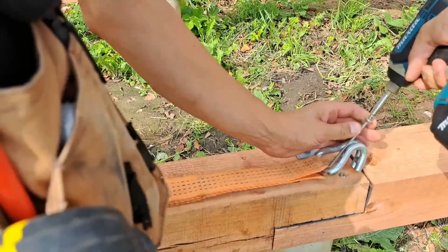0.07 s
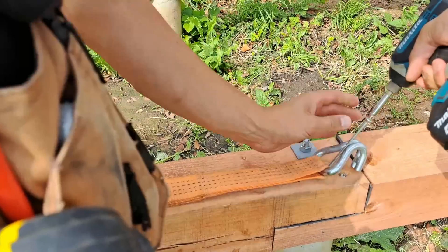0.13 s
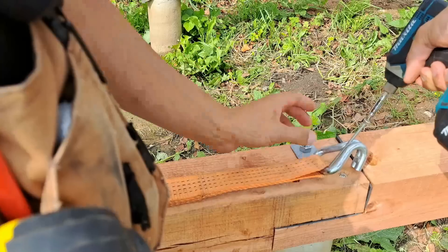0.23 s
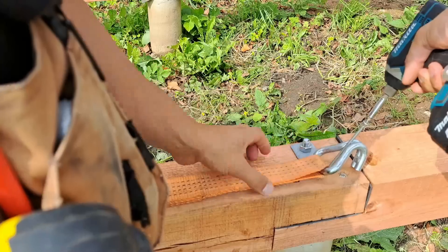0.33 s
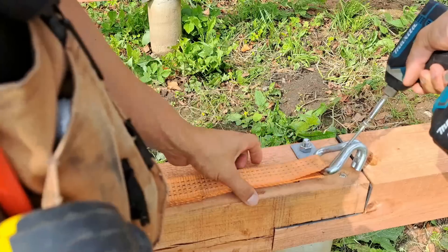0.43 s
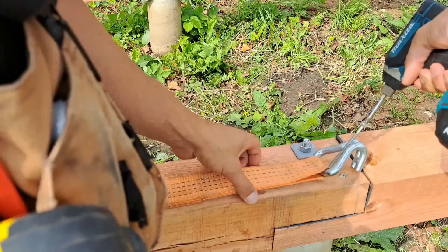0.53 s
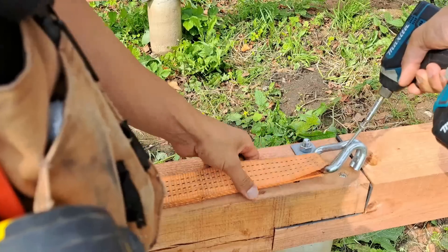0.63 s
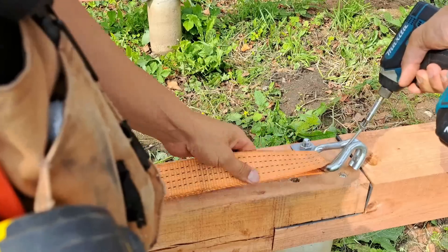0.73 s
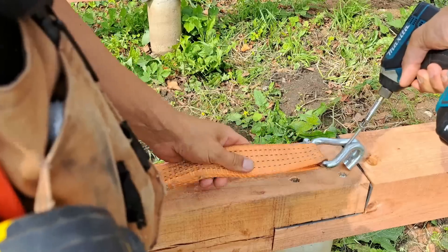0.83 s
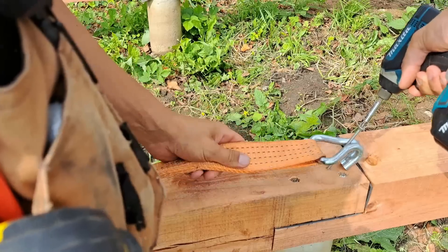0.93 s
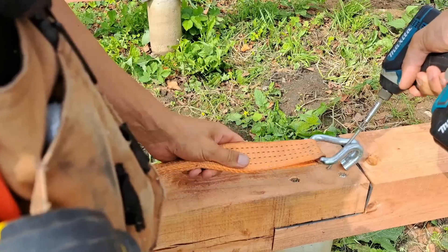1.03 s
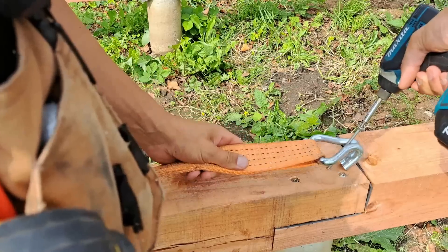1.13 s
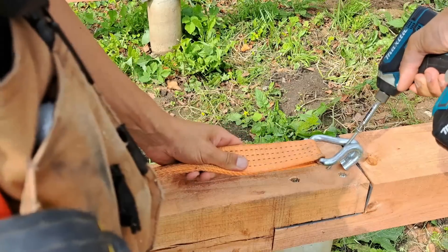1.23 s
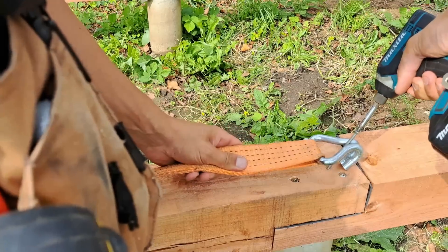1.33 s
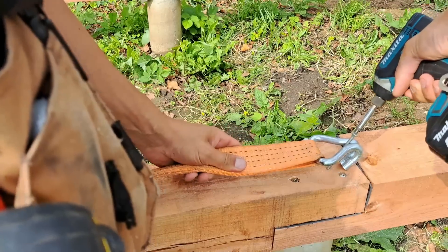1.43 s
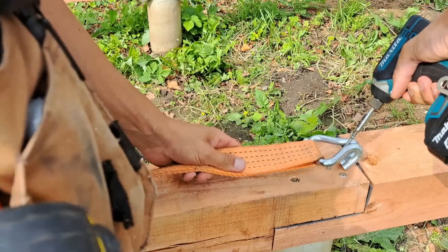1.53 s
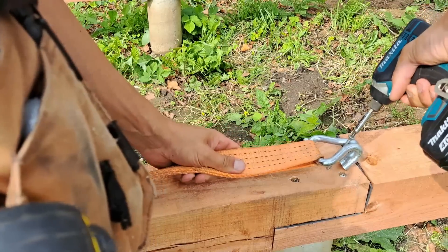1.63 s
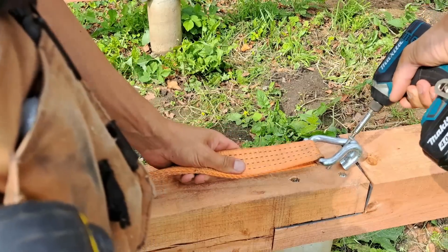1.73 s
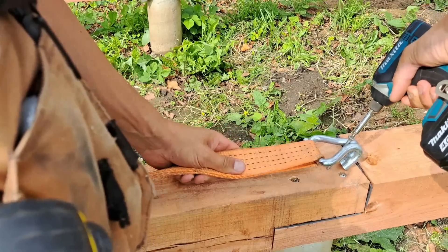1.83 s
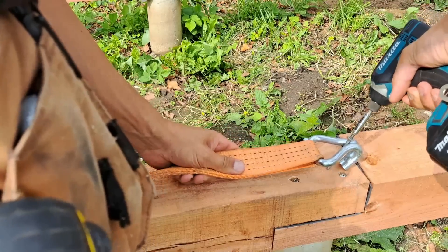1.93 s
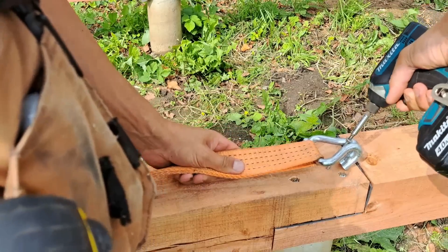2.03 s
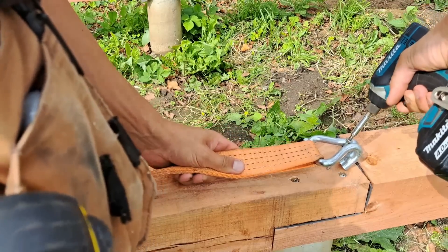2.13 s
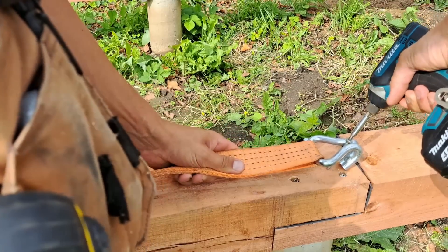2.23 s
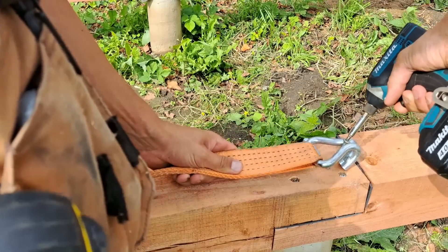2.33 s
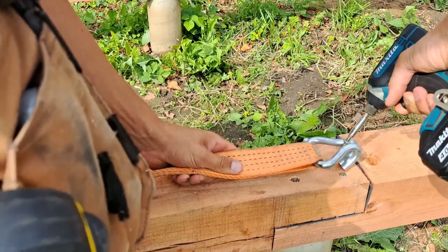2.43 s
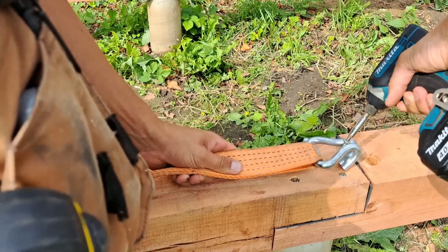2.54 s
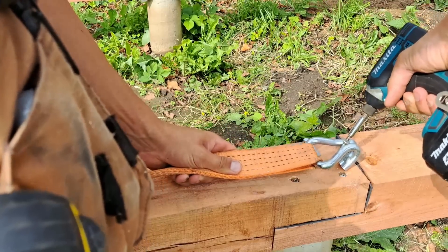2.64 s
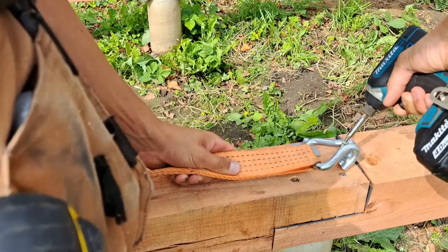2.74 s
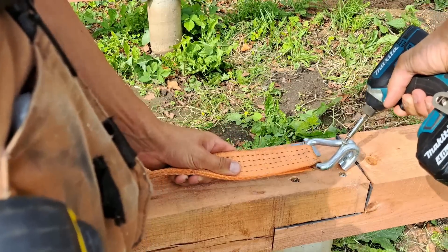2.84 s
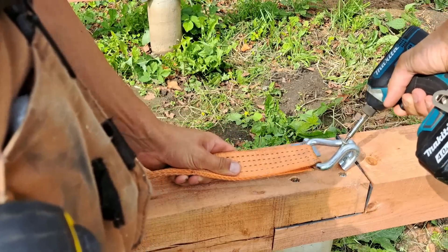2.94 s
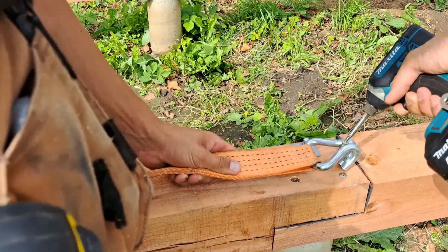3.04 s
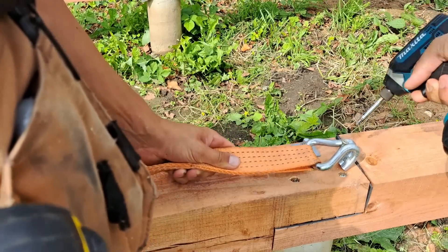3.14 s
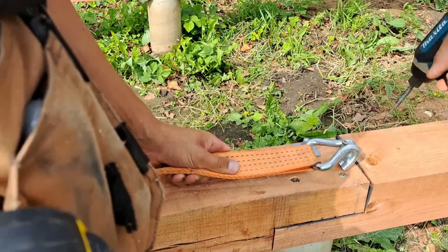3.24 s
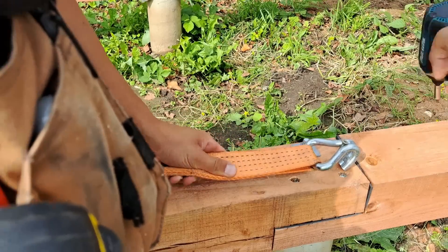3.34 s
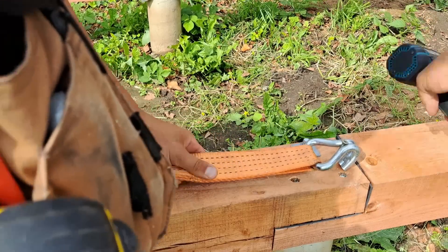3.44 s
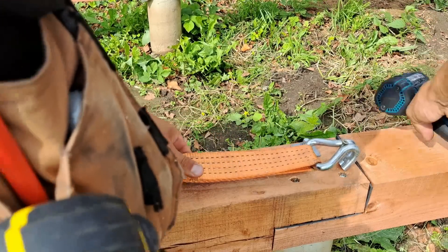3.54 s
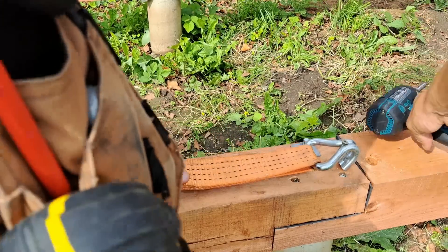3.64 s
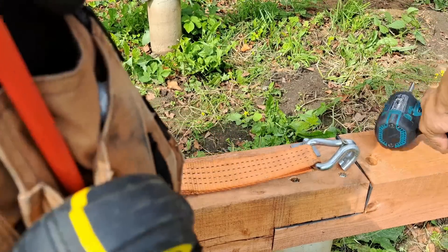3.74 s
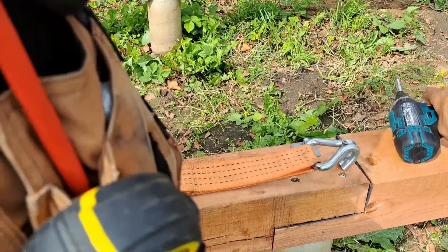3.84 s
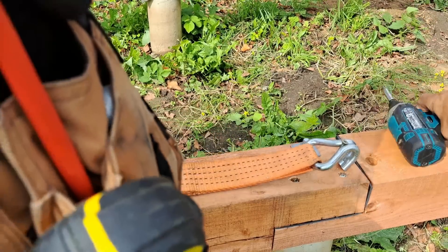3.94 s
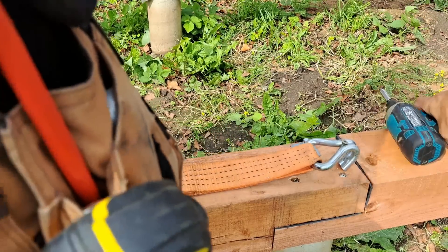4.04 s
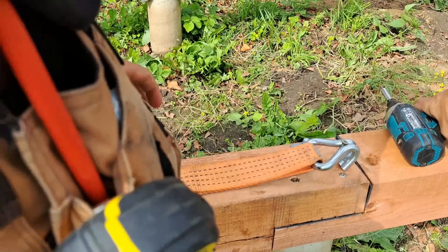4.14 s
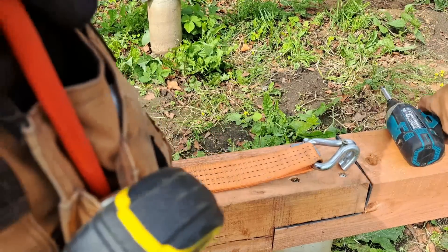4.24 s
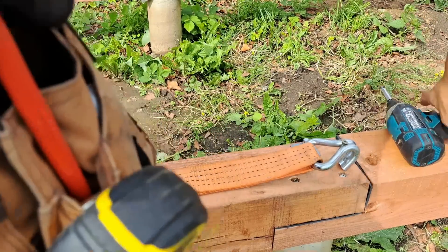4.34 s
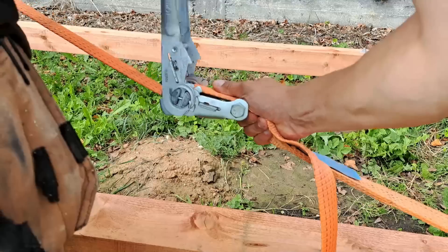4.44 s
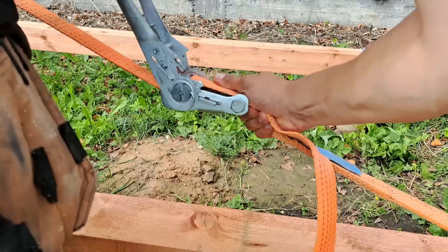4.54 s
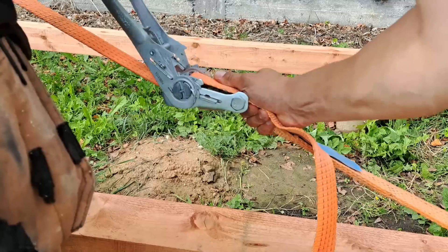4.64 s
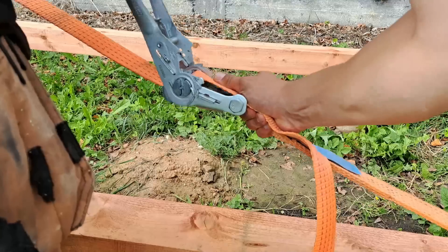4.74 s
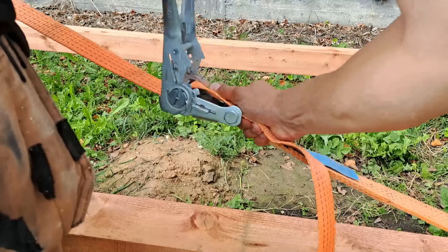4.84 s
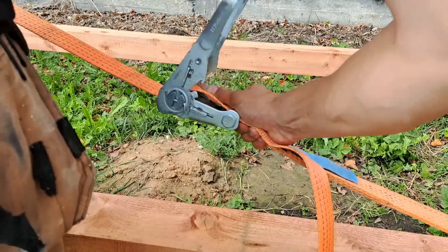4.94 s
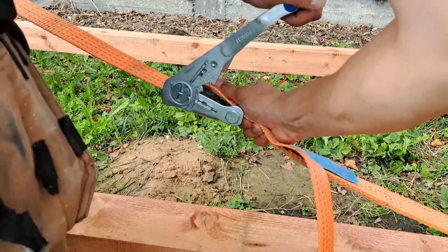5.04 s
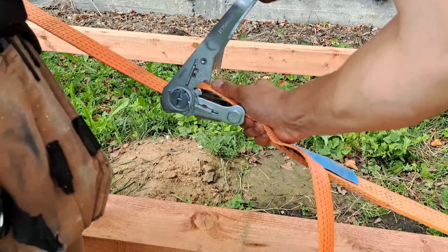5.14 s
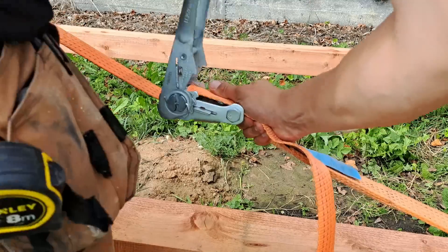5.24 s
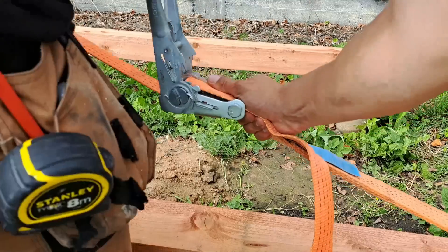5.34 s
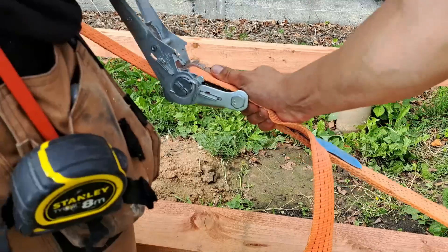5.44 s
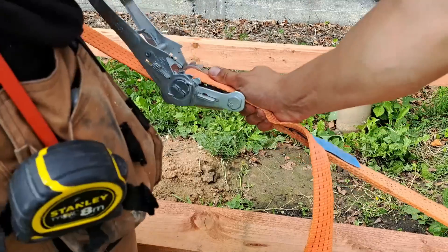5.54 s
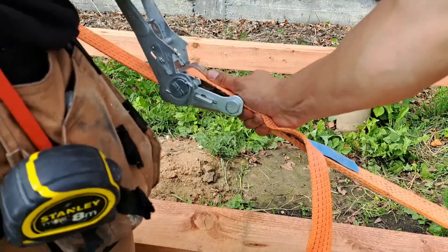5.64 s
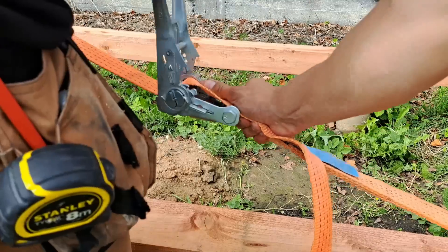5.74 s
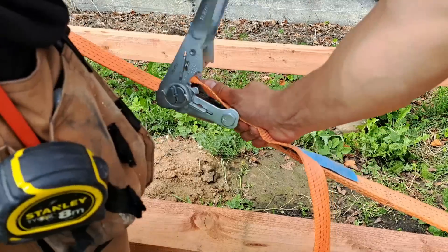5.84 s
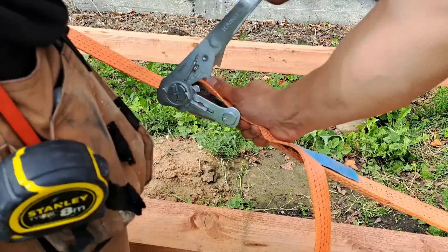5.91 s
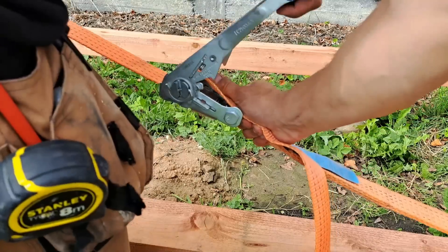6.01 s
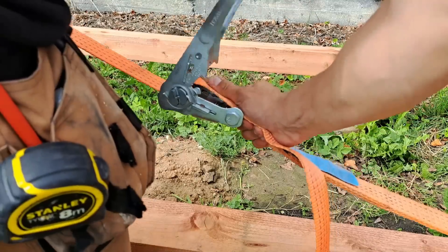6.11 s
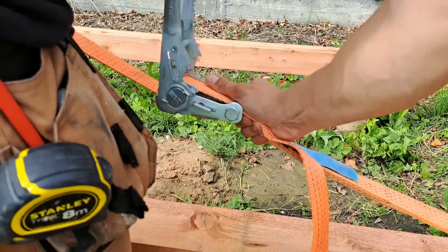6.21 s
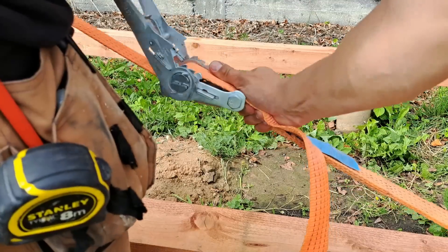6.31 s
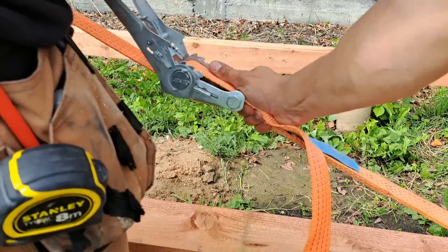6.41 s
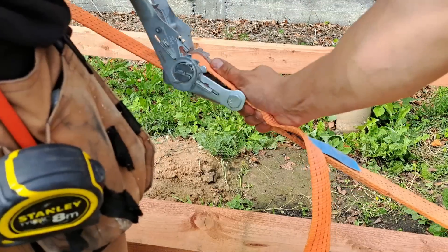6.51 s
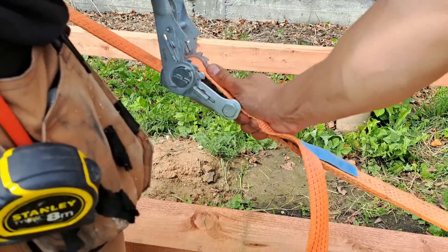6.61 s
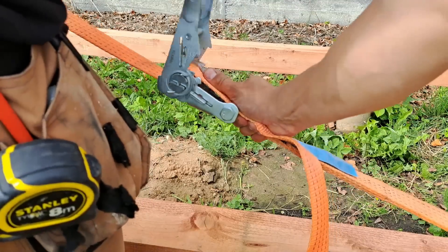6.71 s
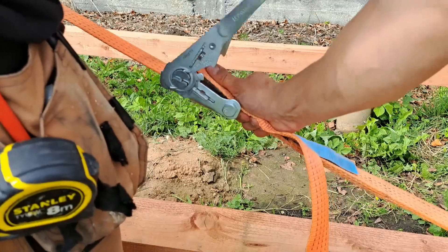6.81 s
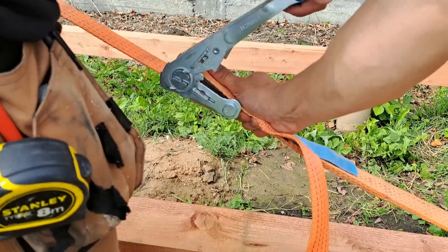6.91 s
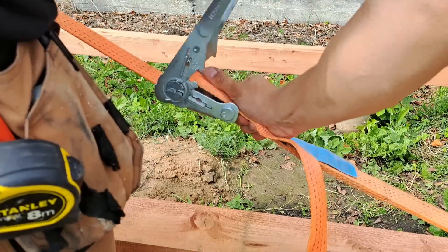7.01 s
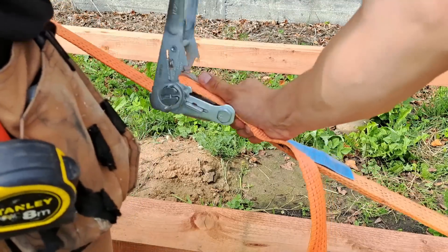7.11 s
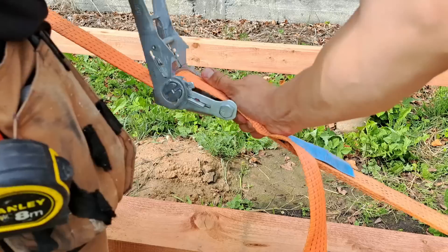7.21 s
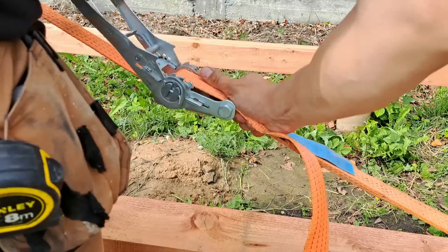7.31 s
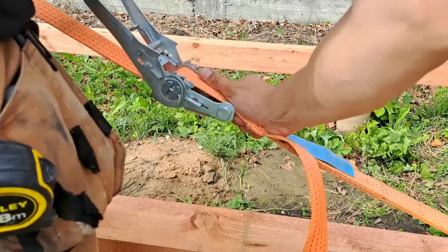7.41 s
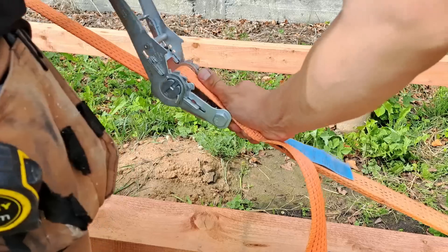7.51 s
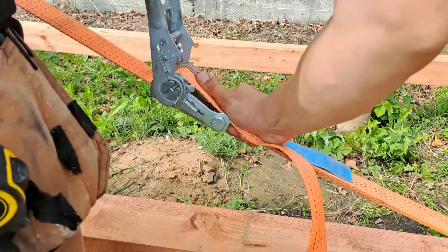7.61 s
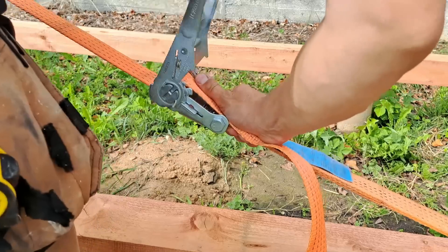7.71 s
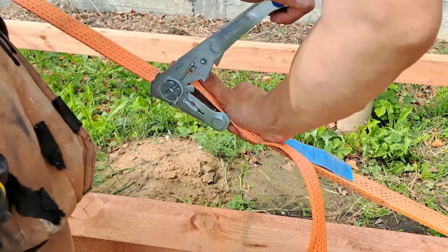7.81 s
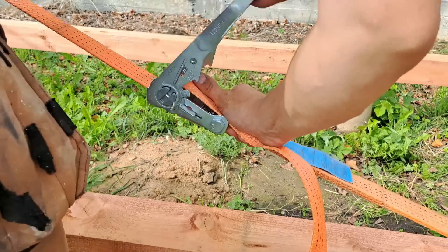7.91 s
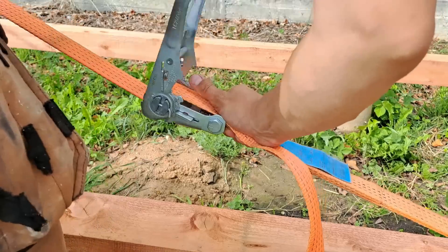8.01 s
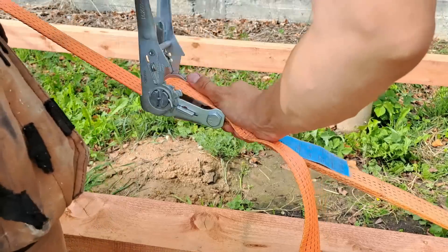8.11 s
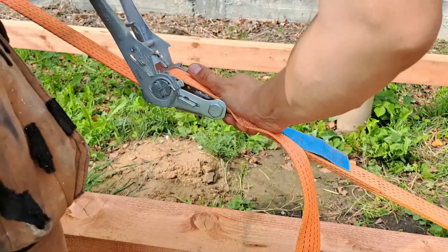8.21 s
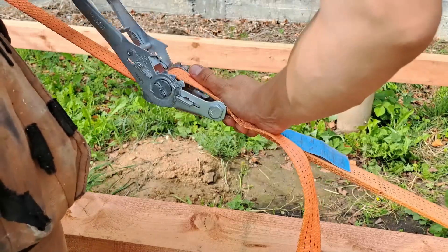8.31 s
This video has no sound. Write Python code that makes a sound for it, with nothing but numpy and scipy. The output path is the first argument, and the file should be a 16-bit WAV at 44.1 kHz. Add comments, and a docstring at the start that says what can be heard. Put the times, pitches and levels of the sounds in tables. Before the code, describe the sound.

First a cordless driver whines briefly a few times, then drives a screw with fast clattering blows, one long burst among short ones. It stops; a tool belt rubs and thumps softly right by the microphone. From the middle on, a metal ratchet near the centre snaps loudly, single clacks at first and later in pairs, with light rattling. Open air, faint hiss, a slight short reflection.

```python
"""Outdoors on a timber frame: an impact driver spins free in short blips, then hammers a screw in, in five bursts.
Its motor is swept lines and noise; its blows are damped steel modes that also excite the timber's resonances.
Then a strap ratchet is pumped: steel pawls snap over the teeth and ring the frame, and the handle rattles.
A tool belt rubs and bumps close to the microphone, as shaped low noise and damped swings, over a faint hiss."""
import sys
import numpy as np
from scipy import signal
from scipy.fft import rfft, irfft, next_fast_len
from scipy.io import wavfile
from scipy.ndimage import uniform_filter1d, map_coordinates

SR = 44100
rng = np.random.default_rng(int(sys.argv[2]) if len(sys.argv) > 2 else 0)


def to_wav(sig):
    """Store sig (one row per channel, or 1-D mono) as 16-bit WAV at the path in sys.argv[1].

    Samples outside -1..1 are clipped; the rate is SR.
    """
    pcm = np.clip(np.atleast_2d(sig), -1, 1) * 32767
    pcm = np.round(pcm).astype(np.int16)
    wavfile.write(sys.argv[1], SR, pcm.T)  # frames by channels


N = 368676
TIME = np.arange(N) / SR
AGE = np.arange(SR // 3) / SR  # time since a blow [s]


def amp(db):
    """Level definition: decibels to amplitude gain."""
    return 10 ** (np.asarray(db) / 20)


def unit(x):
    """Normalization: scale to an rms of 1."""
    return x / np.sqrt(np.mean(x ** 2) + 1e-20)


def along(points, hz):
    """Interpolation of (frequency [Hz], value) points on a logarithmic frequency axis."""
    f, v = np.transpose(points)
    return np.interp(np.log(hz + 1), np.log(f + 1), v)


def wobble(rate):
    """Random modulation: a smooth curve through Gaussian knots, rate of them a second."""
    knots = rng.standard_normal(int(N * rate / SR) + 4)
    return map_coordinates(knots, [TIME * rate])


def filtered(x, response):
    """Linear filtering: the spectrum of x times a complex frequency response."""
    n = x.shape[-1]
    m = next_fast_len(n + 8192)
    return irfft(rfft(x, m) * response(np.fft.rfftfreq(m, 1 / SR)), m)[..., :n]


def noise(spectrum, alike, size=N):
    """Partial coherence: coloured stereo noise of rms 1; alike is the correlation of the sides."""
    a, b = rng.standard_normal((2, size))
    turn = np.arccos(np.clip(alike, -1, 1)) / 2
    pair = np.cos(turn) * a + np.sin(turn) * np.array([b, -b])
    return unit(filtered(pair, lambda hz: amp(along(spectrum, hz))))


def place(x, lag_ms, right_db):
    """Interaural differences: the right side is later by lag_ms and louder by right_db."""
    side = np.array([[-.5], [.5]])
    delayed = filtered(x, lambda hz: np.exp(-2j * np.pi * hz * side * lag_ms / 1000))
    return amp(side * right_db) * delayed


def add(track, s, sound):
    """Superposition: mix a sound in at time s."""
    part = track[:, max(round(s * SR), 0):][:, :sound.shape[-1]]
    part += sound[..., :part.shape[1]]


def gate_db(start, end, rise_db_per_s, fall_db_per_s):
    """Exponential growth and decay, straight in dB: 0 from start to end, falling off outside."""
    before, after = np.maximum(start - TIME, 0), np.maximum(TIME - end, 0)
    return -rise_db_per_s * before - fall_db_per_s * after


def strike(rise, t60):
    """Impact envelope: a smooth onset and exponential decay, with a peak of 1."""
    shape = (1 - np.exp(-(AGE / rise) ** 2)) * amp(-60 * AGE / max(t60, .002))
    return shape / shape.max()


def clack(spectrum, rise, t60, alike, body_db=0, uneven_db=5):
    """High modal density: damped steel modes merge into noise, uneven by chance; body_db lifts the low ones."""
    hz = np.linspace(100, 17000, 90)
    body = body_db / (1 + (hz / 4500) ** 4)
    db = along(spectrum, hz) + body + uneven_db * rng.uniform(-1.5, 1, len(hz))
    return noise(np.column_stack([hz, db]), alike, size=len(AGE)) * strike(rise, t60)


# Course of the outdoor hiss: (time [s], relative level [dB])
HISS_COURSE = [(3.0, -70), (3.45, -72), (4.12, -63), (5.76, -71), (5.89, -67), (7.66, -69), (7.91, -63.5),
               (8.04, -65.5), (8.24, -71), (8.36, -56)]
# Colour of the outdoor hiss: (frequency [Hz], relative level [dB])
HISS_SPECTRUM = [(150, -23.5), (450, -14), (800, -19), (1500, -21.5), (4000, -21), (7500, -22.5),
                 (9500, -27), (15000, -29.5)]


def air():
    """Broadband ambient noise: a faint, slightly restless hiss, stronger at first."""
    hush_db = np.interp(TIME, *np.transpose(HISS_COURSE)) + 4.0
    early_db = np.interp(TIME, [.8, 3.1], [10, 0])
    return amp(hush_db + early_db + 0.44 * wobble(36)) * noise(HISS_SPECTRUM, alike=0.09)


# Decay of the scattered tail: (frequency [Hz], t60 [s])
YARD_DECAY = [(200, .2), (1000, 0.22), (5000, 0.13), (15000, 0.059)]


def yard(x, wall_s):
    """Scattering and reflection: ground and timbers give a short tail, a wall returns a second one."""
    hz, t, z = signal.stft(rng.standard_normal((2, SR // 2)), SR, nperseg=256)
    decay = amp(-60 * t / along(YARD_DECAY, hz)[:, None])
    tail = signal.istft(z * decay, SR, nperseg=256)[1]
    answer = np.zeros((2, SR))
    add(answer, .003, tail)
    add(answer, wall_s, amp(-15) * tail[::-1])  # sides swapped
    return signal.fftconvolve(x, answer / np.linalg.norm(answer[0]), axes=1)[:, :N]


# Movement of the tool belt near the microphone, stretch by stretch: (time [s], relative level [dB])
BELT_MOVES = [
    [(0.0, -54), (0.05, -44), (0.094, -61), (0.266, -54), (0.312, -46.5), (0.338, -49.5), (0.62, -48)],
    [(0.92, -44), (1.19, -41), (1.53, -56.5), (1.68, -43), (2.31, -58.5), (2.7, -44.5), (3.48, -68.5)],
    [(3.5, -67), (3.57, -49), (3.646, -53), (3.92, -48.5), (3.95, -33), (4.002, -47), (4.12, -41)],
    [(4.14, -52), (4.222, -51.5), (4.324, -40.5), (4.35, -59), (4.38, -27), (4.448, -70), (4.48, -77)],
    [(4.5, -62), (4.664, -54.5), (5.312, -81.5), (5.356, -50.5), (5.598, -83.5), (5.878, -58.5), (6.3, -71)],
    [(6.32, -81), (6.64, -89), (6.92, -61), (7.0, -99.5), (7.94, -55), (8.0, -74), (8.36, -57)],
]
# Colour of the cloth's rumble: (frequency [Hz], relative level [dB])
RUMBLE_SPECTRUM = [(12, -38.5), (20, -10.5), (43, -2), (59, 6.5), (86, -2.5), (125, 1.5), (221, -19),
                   (300, -13), (390, -46), (660, -120)]
# Colour of the cloth's rub: (frequency [Hz], relative level [dB])
RUB_SPECTRUM = [(90, -15.5), (160, -1), (220, -5), (330, -0.5), (470, -7), (700, -22.5), (1500, -43)]
MOVE_TOP_DB, USUAL_MOVE_DB = -38.5, -50  # cap on the movement; harder contacts are bumps
RUMBLE_DB, RUB_DB, RUB_GROWS = 1, -6.5, 1.3  # the rub swings a little wider than the rumble
RUB_SMOOTHING_S = 0.21  # the movement is smoothed over this time for the rub


def belt():
    """Friction noise: cloth rumbles in lumps and rubs, and the harder it moves, the more it rubs."""
    move_db = np.minimum(np.interp(TIME, *np.concatenate(BELT_MOVES).T), MOVE_TOP_DB)
    lumps_db = 2 * wobble(22)
    slow_db = uniform_filter1d(move_db, max(round(RUB_SMOOTHING_S * SR), 1))
    rub_db = USUAL_MOVE_DB + RUB_DB + RUB_GROWS * (slow_db - USUAL_MOVE_DB)
    rub_db = rub_db + .6 * lumps_db + 1.5 * wobble(45)
    rumble = amp(move_db + RUMBLE_DB + lumps_db) * noise(RUMBLE_SPECTRUM, alike=0.091)
    rumble = rumble * amp([[-2.5], [2.5]])  # louder on the right
    return rumble + amp(rub_db) * noise(RUB_SPECTRUM, alike=1.0)


# Dull bumps of tools, belt and strap: (time [s], relative level [dB], pitch [Hz], decay scale [s])
DULL_BUMPS = [(.792, -22, 418, 0.096), (0.81, -18.5, 112, 0.18), (.83, -14.5, 254, 0.071),
              (0.864, -28, 230, .08), (3.567, -33, 120, .07), (3.933, -28, 228, 0.042),
              (3.948, -21.5, 81.3, .07), (3.977, -24, 214, 0.12), (4.042, -20.5, 350, 0.067),
              (4.055, -27.5, 190, 0.13), (4.078, -25, 140, 0.079), (4.43, -35, 90, 0.045),
              (8.206, -12.5, 375, 0.059), (8.225, -23.5, 334, 0.14)]


def bumps():
    """Damped oscillation: a soft, heavy contact gives a low swing with a puff of noise around it."""
    out = np.zeros((2, N))
    for s, db, hz, decay in DULL_BUMPS:
        colour = [(hz / 4, -24), (hz * 0.94, -1), (hz, 0), (hz * 2.67, -8), (hz * 4, -26), (hz * 16, -55)]
        puff = noise(colour, alike=0.24, size=len(AGE)) * strike(rise=0.00099, t60=decay * 1.54)
        swing = np.sin(2 * np.pi * hz * AGE) * strike(rise=0.0024, t60=decay * 0.62)
        add(out, s, amp(db - 10.5) * puff + amp(db - 5.5) * swing)
    return out


# Light contacts of handle, hook and tools: (time [s], relative level [dB], low-mode lift before scaling [dB])
LIGHT_RATTLES = [(0.806, -37, 17), (4.0414, -21, -2), (4.0791, -36, 6), (4.8233, -31, -35.5),
                 (4.8654, -28, -26), (4.8876, -27, -24.5), (5.1559, -39.5, -18), (5.2608, -36.5, -16),
                 (5.3824, -52.5, 16), (5.7237, -33, -18.5), (5.7685, -44, -13), (5.808, -31, -19),
                 (6.1677, -34.5, -31), (6.1948, -36, -6.5), (7.056, -47, -12), (7.0719, -33, -8),
                 (7.7108, -44, -48), (7.9855, -37, -41), (7.9942, -31, -11), (8.0063, -28, -21),
                 (8.056, -49, 2)]
# Colour of loose steel parts: (frequency [Hz], relative level [dB])
RATTLE_SPECTRUM = [(400, -11), (900, -9.5), (1400, 1), (2400, 2.5), (5000, 4), (8000, -2), (12000, -7.5),
                   (16000, -11)]
PUMPING_S, TICKS_PER_S, TICK_DB = (4.6, 8.2), 1.8, -52  # faint stray ticks while the handle is worked


def rattles():
    """Repeated impact: steel parts touch lightly after a faint swell, and settle in smaller, duller ticks."""
    out = np.zeros((2, N))
    for s, db, body_db in LIGHT_RATTLES:
        touch = clack(RATTLE_SPECTRUM, rise=0.00092, t60=0.026, alike=0.46, body_db=0.84 * body_db + 2.5)
        add(out, s, amp(db - 1.5) * touch)
        swell = clack(RATTLE_SPECTRUM, rise=.012, t60=0.078, alike=.5, body_db=0.15 * body_db + 6)
        add(out, s - .014, amp(db - 24.5) * swell)
        for delay in rng.uniform(0.0016, 0.016, size=4):
            tick = clack(RATTLE_SPECTRUM, rise=0.0014, t60=.025, alike=.5,
                         body_db=0.24 * body_db + 16, uneven_db=1.0)
            add(out, s + delay, amp(db - 17.5 - 440 * delay) * tick)
    stray_count = round((PUMPING_S[1] - PUMPING_S[0]) * TICKS_PER_S)
    for s in rng.uniform(*PUMPING_S, size=stray_count):
        stray = clack(RATTLE_SPECTRUM, rise=0.00035, t60=0.028, alike=0.72, body_db=-5.5)
        add(out, s, amp(TICK_DB) * stray)
    return out


# Resonances of the ratchet's steel frame: (nominal frequency [Hz], relative level [dB], t60 [s])
FRAME_MODES = [(2290, -21, .24), (3360, -11, .1), (4040, -15, .16), (5550, -10, .09), (7000, -12, .12),
               (8230, -8, .14), (10040, -2, .06), (10400, -11, .1), (11600, -3, .13), (12700, -2, .1),
               (13630, -6, .11), (14500, 6.5, .077), (15600, -1, .1)]
FRAME_DB, FRAME_SCATTER_DB = -25, 4  # the ring within a snap; spread of its modes


def frame_ring():
    """Modal synthesis: decaying sines ring anew, randomly detuned, with wandering phases."""
    hz, db, t60 = np.transpose(FRAME_MODES)[:, :, None]
    hz = hz * (1 + rng.normal(0, .018, hz.shape))
    steps = rng.standard_normal((2, len(hz), len(AGE)))
    drift = np.cumsum(steps, axis=2) * np.sqrt(2 * np.pi * 110 / SR)
    phase = 2 * np.pi * rng.random((len(hz), 1)) + drift
    decay = amp(db + rng.normal(0, FRAME_SCATTER_DB, hz.shape) - 60 * AGE / t60)
    modes = decay * np.sin(2 * np.pi * hz * AGE + phase)
    return modes.sum(1) * (1 - np.exp(-AGE / 0.00054))


# Pawl snapping over a tooth: (time [s], relative level [dB], body level, used against its mean [dB], t60 [s])
PAWL_SNAPS = [(4.5708, -8, -27.5, 0.014), (5.0271, -4.5, -28.5, 0.018), (5.44, -9.5, -21, 0.015),
              (5.9736, -6, -27, 0.018), (6.3353, -9, -24.5, 0.022), (6.4471, -17.5, -16, 0.018),
              (6.7804, -5.5, -26, 0.02), (6.8886, -7, -25.5, 0.032), (7.2687, -11.5, -22, 0.041),
              (7.3858, -12, -24, 0.023), (7.7525, -6, -26.5, 0.032), (7.859, -4.5, -30.5, 0.032),
              (8.2105, -12.5, -16.5, 0.022), (8.3255, -17.5, -29.5, 0.0282)]
# Colour of the pawl's steel: (frequency [Hz], relative level [dB])
PAWL_SPECTRUM = [(300, -26.5), (700, -23.5), (1700, -13), (3400, -11), (4200, -6.5), (5500, -3), (9000, -1),
                 (11700, -1.5), (12700, 2), (14600, 2), (16000, -1.5)]
# Pawl catching on the tip of a tooth just before it snaps: (time [s], relative level [dB])
TIP_CATCHES = [(4.565, -16), (5.4346, -20.5), (6.4413, -22.5), (7.38, -23.5), (8.205, -13.5), (8.322, -15)]
# Pawl spring shivering after a snap: (time [s], relative level [dB])
SPRING_SHIVERS = [(5.101, -42.5), (6.049, -43), (6.939, -35.5), (7.836, -45)]
# Colour of the spring: (frequency [Hz], relative level [dB])
SPRING_SPECTRUM = [(2000, -30), (2800, -31), (3050, 3), (3400, -26), (4050, -14), (4600, -21), (6500, -18),
                   (7200, -9), (8000, -19), (16000, -22)]
SHIVER_GAP_S, SHIVER_LOSS_DB = .0175, 4  # between successive shivers


def ratchet():
    """Impact and ringing: a faint noise swells just before each snap, which bounces once and rings the frame."""
    out = np.zeros((2, N))
    usual_db = np.mean([row[2] for row in PAWL_SNAPS])
    for s, db, body_db, t60 in PAWL_SNAPS:
        def snap():
            """Impact of the pawl on the next tooth, newly drawn at each contact."""
            return clack(PAWL_SPECTRUM, rise=0.00066, t60=t60, alike=0.47,
                         body_db=body_db - usual_db, uneven_db=5.5)
        swell = clack(PAWL_SPECTRUM, rise=.005, t60=.05, alike=.5, body_db=5)
        add(out, s - .007, amp(db - 27) * swell)
        add(out, s, amp(db) * (amp(-2.0) * snap() + amp(FRAME_DB) * frame_ring()))
        add(out, s + .002, amp(db - 6.5) * snap())  # the bounce
    for s, db in TIP_CATCHES:
        add(out, s, amp(db) * clack(PAWL_SPECTRUM, rise=0.0012, t60=0.052, alike=0.17, body_db=3.0))
    for s, db in SPRING_SHIVERS:
        for k in range(3):
            shiver = clack(SPRING_SPECTRUM, rise=.0015, t60=.035, alike=.5)
            add(out, s + k * SHIVER_GAP_S, amp(db - 2 - k * SHIVER_LOSS_DB) * shiver)
    return out


# Ticks of the driver's trigger switch: (time [s], relative level [dB])
TRIGGER_TICKS = [(0.214, -44), (0.548, -41.5), (0.846, -33), (2.247, -55.5), (2.61, -49.5)]
# Colour of the switch: (frequency [Hz], relative level [dB])
SWITCH_SPECTRUM = [(2500, -23.5), (3800, -18), (4500, -15), (5000, 1), (5600, -13.5), (8000, -32),
                   (16000, -33)]


def trigger():
    """Contact impact: the switch ticks just before the motor starts."""
    out = np.zeros((2, N))
    for s, db in TRIGGER_TICKS:
        add(out, s, amp(db) * clack(SWITCH_SPECTRUM, rise=0.001, t60=0.029, alike=0.27))
    return out


# Driver spinning free: (trigger pressed [s], released [s], relative level [dB], braking time constant [s])
FREE_BLIPS = [(-.1, .003, -29, 0.076), (0.242, .372, -26.5, 0.034), (0.571, 0.697, -25.5, .028),
              (0.863, 0.902, -29.5, 0.031)]
# Gear and motor lines: (frequency at full speed [Hz], relative level [dB])
WHINE_LINES = [(1480, -0.5), (2880, 0), (3350, -2.5), (5000, 1), (6400, -5)]
# Colour of fan and gears: (frequency [Hz], relative level [dB])
WHIRR_SPECTRUM = [(180, -19.5), (300, -1.5), (689, -5), (828, -14.5), (1210, -1.5), (1530, -4.5),
                  (2210, -4), (2360, -13), (2610, 1), (6200, -7.5), (9390, -14), (15000, -7.5),
                  (16000, -20)]
IDLE_SPEED = .08  # share of full speed at which the whine starts
SPIN_UP_S, SPIN_DOWN_S, WHIRR_RISE_S = .055, .065, 0.045  # time constants


def free_run():
    """Rotational noise: fan and gears whirr, and their rough, fitful whine follows the speed."""
    speed, loudness = np.zeros(N), np.zeros(N)
    for on, off, db, brake_s in FREE_BLIPS:
        driven, coasting = np.maximum(TIME - on, 0), np.maximum(TIME - off, 0)
        speed += (1 - np.exp(-driven / SPIN_UP_S)) * np.exp(-coasting / SPIN_DOWN_S)
        rise = 1 - np.exp(-(driven / WHIRR_RISE_S) ** 2)
        loudness += amp(db) * rise * np.exp(-(coasting / brake_s) ** 2)
    speed = IDLE_SPEED + (1 - IDLE_SPEED) * speed
    lines = np.zeros(N)
    for hz, db in WHINE_LINES:
        fitful = amp(db + 5 * wobble(55))
        rough_hz = hz * speed + 58 * wobble(300)
        lines += fitful * np.sin(2 * np.pi * np.cumsum(rough_hz) / SR)
    whine = amp(-6.5) * unit(lines)
    chatter = amp(1.4 * wobble(500))
    return loudness * (amp(-2.0) * chatter * noise(WHIRR_SPECTRUM, alike=0.12) + whine)


# Driver under load: (start [s], end [s], relative grind level [dB], relative level of the shaken beam [dB])
LOAD_BURSTS = [(0.899, 1.057, -27, -27), (1.183, 1.813, -28.5, -31), (1.965, 2.146, -29, -35),
               (2.303, 2.429, -29, -32.5), (2.666, 2.794, -30, -30.5)]
# Hammer ticking over as the motor coasts: (start [s], end [s], first and last relative level [dB])
MOTOR_COASTS = [(1.061, 1.207, -29, -34), (1.876, 1.937, -49.5, -43.5), (2.83, 2.972, -36, -48)]
# Colour of cam and gears: (frequency [Hz], relative level [dB])
GRIND_SPECTRUM = [(410, -38), (700, -8), (830, -13.5), (946, 3), (1080, -8), (1660, 3), (4050, -0.5),
                  (7110, -6.5), (9600, -10.5), (11400, -4), (16000, -12)]
COAST_GRIND_DB = -13  # the gears under the ticking of a coasting motor


def grind():
    """Gear-mesh noise: cam and gears grind under load, and more faintly as the motor coasts."""
    load = np.zeros(N)
    for start, end, db, _ in LOAD_BURSTS:
        load += amp(db + gate_db(start, end, rise_db_per_s=3400, fall_db_per_s=478.5))
    for start, end, first_db, last_db in MOTOR_COASTS:
        coast_db = np.interp(TIME, [start, end], [first_db, last_db]) + COAST_GRIND_DB
        load += amp(coast_db + gate_db(start, end, rise_db_per_s=1499, fall_db_per_s=900))
    return load * unit(noise(GRIND_SPECTRUM, alike=0.18) * amp(1.2 * wobble(590)))


# Driver jolting as the screw bites or stops: (time [s], relative clack level [dB], relative wood thud level [dB])
SCREW_JOLTS = [(0.9042, -9, -16), (1.049, -13, -19), (1.186, -19, -33.5), (1.204, -4.5, -20.5),
               (1.7546, -6.5, -13), (1.7989, -7, -24.5), (1.9454, -21.5, -38), (1.9647, -10, -18.5),
               (2.13, -5.5, -12.5), (2.3047, -24.5, -35), (2.426, -9.5, -19), (2.669, -11, -22),
               (2.7852, -8, -14.5)]
# The hammer's contacts in one jolt: (delay [s], relative level [dB])
JOLT_CONTACTS = [(0, 1), (.0085, -5), (.028, -8)]
# Steady hammering: (first blow [s], last blow [s], nominal rate [blows/s], mean relative level [dB])
HAMMER_RUNS = [(0.9208, 1.0057, 36, -5), (1.212, 1.7317, 36.5, -4), (1.9736, 2.1050, 38, -5),
               (2.3223, 2.3985, 39, -5), (2.6867, 2.757, 42, -4)]
BLOW_SCATTER_DB, BLOW_SCATTER_S = 2.8, 0.00039  # standard deviation from blow to blow


def blows():
    """Periodic impact: (time [s], relative level [dB]) of blows, nearly even in a run, rebounding in a jolt."""
    rows = [(s + delay, db + change_db) for s, db, _ in SCREW_JOLTS for delay, change_db in JOLT_CONTACTS]
    for first, last, rate, db in HAMMER_RUNS:
        for s in np.linspace(first, last, round((last - first) * rate) + 1):
            rows.append((s + BLOW_SCATTER_S * rng.normal(), db + BLOW_SCATTER_DB * rng.normal()))
    return rows


# Resonances of the timber: (frequency [Hz], width [Hz], relative level [dB])
BEAM_MODES = [(322, 50, 1), (492, 66, -1), (708, 46, 2), (955, 38, -3.5), (1175, 70, -2.5), (1680, 180, -7),
              (2190, 120, -4), (3180, 90, -1), (3400, 70, -6)]


def beam(force):
    """Forced vibration: the timber answers a force with its resonances, over a broad, dead thud."""
    def response(f):
        """Modal superposition with alternating signs, and a high-pass below about 250 Hz."""
        total = amp(-15.5) * 1j / (1 + (f / 2000) ** 2)  # the thud
        for k, (centre, width, db) in enumerate(BEAM_MODES):
            damping = 1j * f * width
            total = total + (-1) ** k * amp(db) * damping / (centre * centre - f * f + damping)
        return total / (1 + (250 / (f + 1)) ** 8)
    return filtered(force, response)


SCREW_EASES_DB_PER_S, SCREW_RISE_DB_PER_S, SCREW_FALL_DB_PER_S = 8, 1398, 399.5
KNOCK_DB = -27  # a blow's knock on the beam, relative to the blow
JOLT_RISE_S, JOLT_T60_S = .003, 0.074  # the thud of a jolt in the wood


def screw(hits):
    """Structure-borne sound: turning screw, blows and jolts shake the beam; each burst eases as it lasts."""
    push = np.zeros(N)
    for start, end, _, db in LOAD_BURSTS:
        eased_db = db - 1 - SCREW_EASES_DB_PER_S * np.maximum(TIME - start, 0)
        push += amp(eased_db + gate_db(start, end, SCREW_RISE_DB_PER_S, SCREW_FALL_DB_PER_S))
    knocks = np.zeros((1, N))
    for s, db in hits:
        add(knocks, s, amp(db + KNOCK_DB) * strike(rise=0.0019, t60=0.013))
    for s, _, db in SCREW_JOLTS:
        add(knocks, s, amp(db - 3) * strike(rise=JOLT_RISE_S, t60=JOLT_T60_S))
    force = noise([(300, 2.0), (600, -1), (1200, 2.0), (3500, -5.0)], alike=.8)
    return beam(force * (push + knocks)) / np.std(beam(force))


# Colour of hammer on anvil: (frequency [Hz], relative level [dB])
ANVIL_SPECTRUM = [(500, -17), (1000, -9), (2200, 3), (3800, -0.5), (5600, 4.5), (7500, -1), (9500, -3.5),
                  (12000, 3), (15500, -8.5)]


def hammer(hits):
    """Impact excitation: the hammer strikes the anvil, and only ticks when the motor coasts."""
    out = np.zeros((2, N))
    for s, db in hits:
        blow = clack(ANVIL_SPECTRUM, rise=0.00061, t60=0.018, alike=0.2, uneven_db=11.0)
        add(out, s - .0005, amp(db - 5.5) * blow)
    for start, end, first_db, last_db in MOTOR_COASTS:
        for s in np.arange(start, end, .0135):
            db = np.interp(s, [start, end], [first_db, last_db]) + rng.normal(0, 4.4)
            add(out, s, amp(db) * clack(GRIND_SPECTRUM, rise=.0004, t60=0.025, alike=0.55))
    return out


def scene():
    """Superposition of sources: driver to the right, ratchet near the middle, belt at the microphone."""
    hits = blows()
    driver = free_run() + grind() + hammer(hits) + screw(hits) + trigger()
    driver = place(driver, lag_ms=-0.12, right_db=1.5)
    strap = place(ratchet() + rattles(), lag_ms=0.069, right_db=1)
    echoes = amp(-19.5) * yard(driver, wall_s=0.015) + amp(-12) * yard(strap, wall_s=0.024)
    return driver + strap + echoes + bumps() + belt() + air()


TOP_HZ = 16000


def record(dry):
    """Band limiting: peaks are clipped, then a steep low-pass cuts above TOP_HZ."""
    return filtered(np.clip(dry, -1, 1), lambda hz: 1 / (1 + (hz / TOP_HZ) ** 120))


dry = scene()
out = record(dry)
to_wav(out)
```